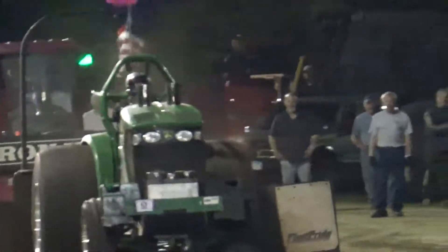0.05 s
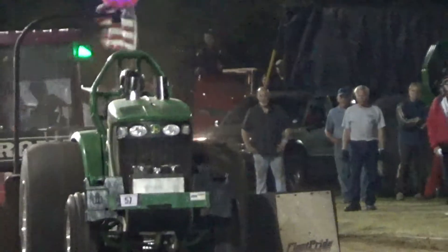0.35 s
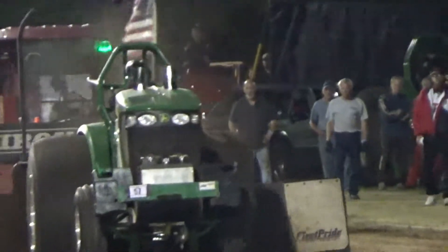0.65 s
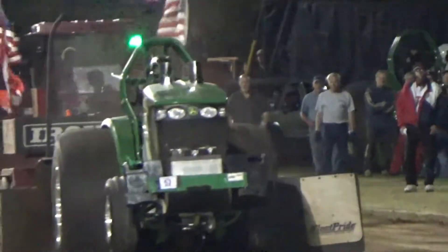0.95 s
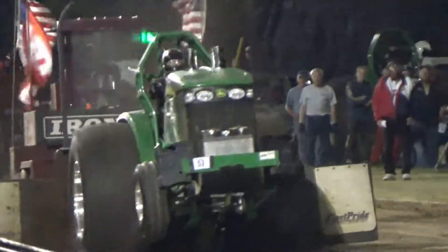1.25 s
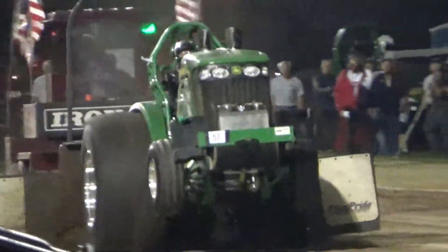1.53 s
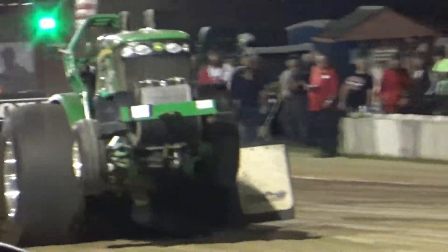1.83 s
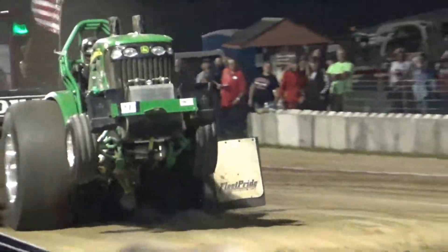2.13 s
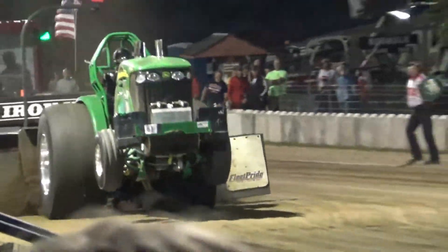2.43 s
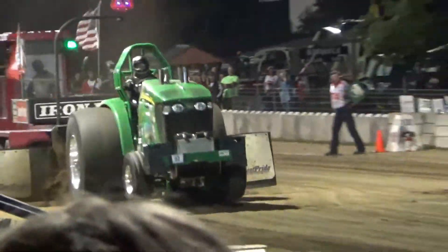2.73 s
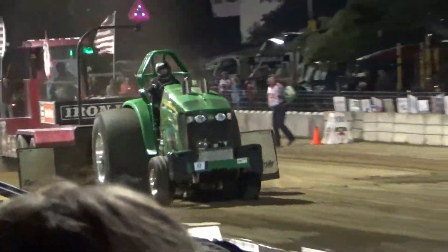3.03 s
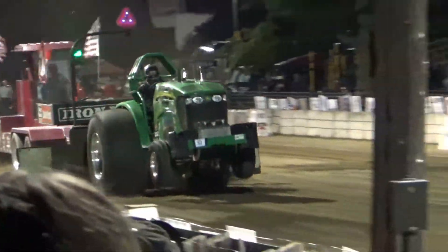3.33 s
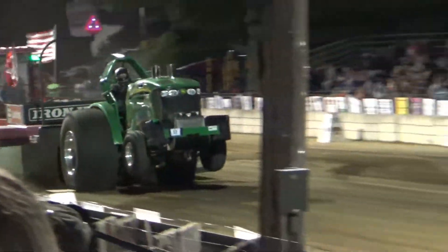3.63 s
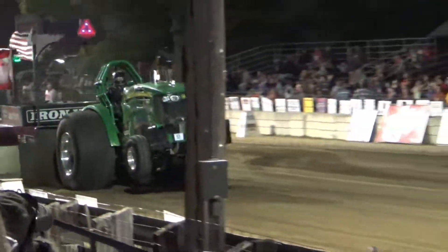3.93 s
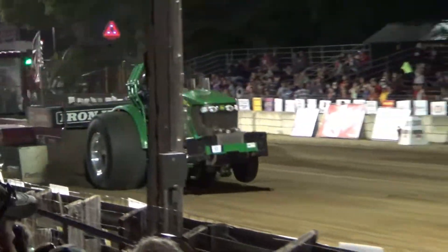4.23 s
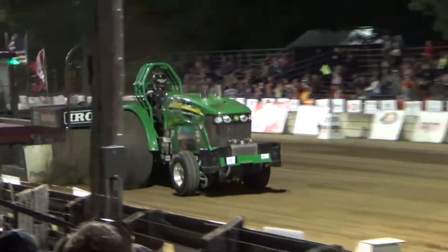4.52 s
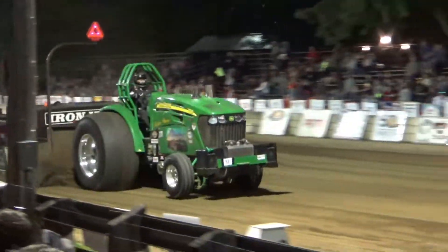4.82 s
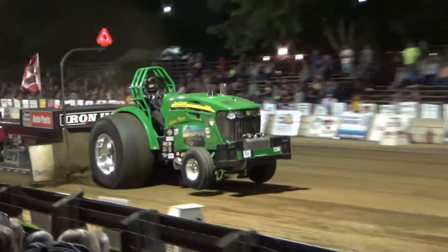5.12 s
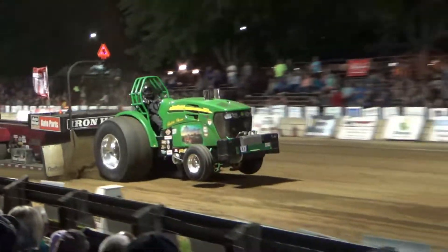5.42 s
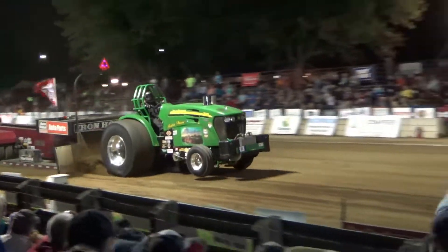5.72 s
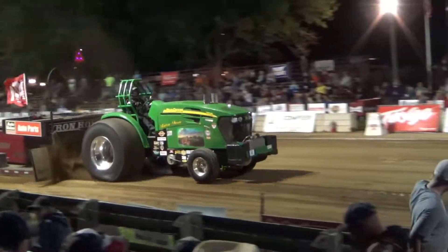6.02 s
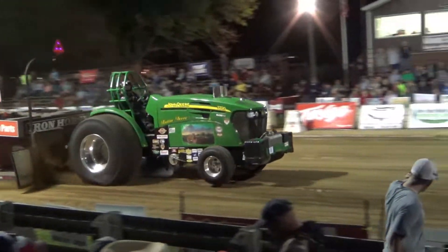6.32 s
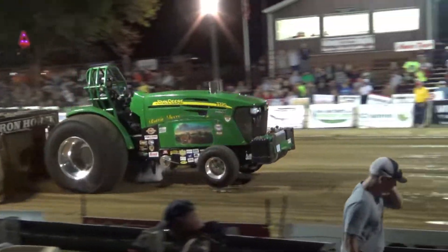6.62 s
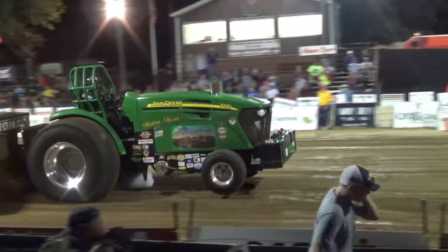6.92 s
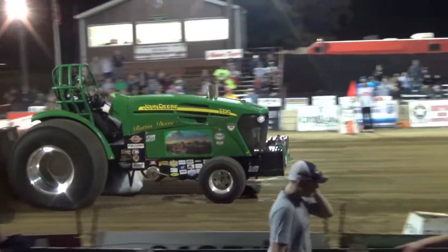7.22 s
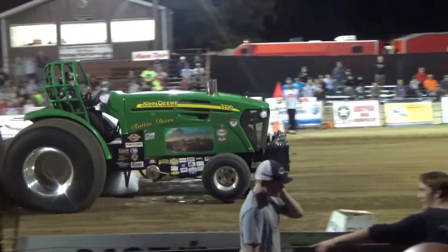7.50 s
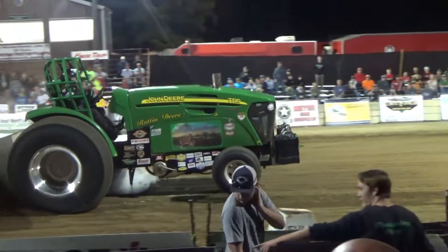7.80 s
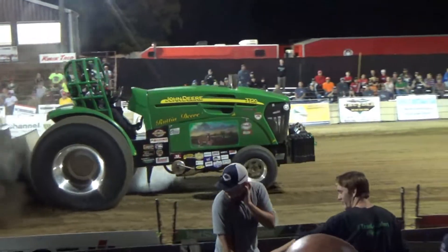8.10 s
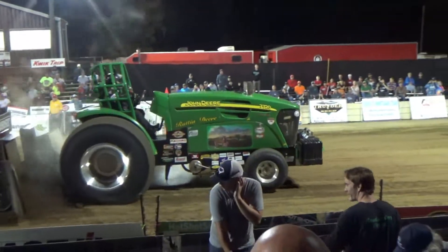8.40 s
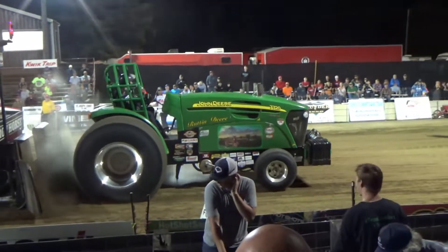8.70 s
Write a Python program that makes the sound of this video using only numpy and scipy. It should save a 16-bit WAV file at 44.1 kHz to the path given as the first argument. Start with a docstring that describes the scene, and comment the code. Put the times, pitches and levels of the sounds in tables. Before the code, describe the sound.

A turbocharged tractor approaches under heavy load, its rushing exhaust roar and engine drone topped by a piercing whistle.

```python
"""A jet-like roar comes head-on: a turbocharged six-cylinder pulling tractor dragging a sled at full power.
Turbulent gas rushes from its open stack, two turbo whistles waver with the revs, the firing drones below.
It passes behind a pole with a brief comb sweep and draws level with the stands,
loud enough to overload the microphone."""
import sys
import numpy as np
from scipy import signal
from scipy.fft import rfft, irfft, next_fast_len
from scipy.io import wavfile
from scipy.ndimage import uniform_filter1d, map_coordinates

SR = 44100
rng = np.random.default_rng(int(sys.argv[2]) if len(sys.argv) > 2 else 0)


def output_pcm(signal):
    """Save a mono or channel-first signal as 16-bit PCM at the path in sys.argv[1].

    Samples are clipped to [-1, 1] before scaling.
    """
    pcm = np.clip(np.atleast_2d(signal).T, -1, 1) * 32767
    wavfile.write(sys.argv[1], SR, np.round(pcm).astype(np.int16))


N = 394694

# the tractor's approach: (time [s], flank turned to the stands [0-1], closeness [0-1])
APPROACH = [(0, 0, 0), (2.6, 0, 0.07), (4, 0.27, 0.11), (5.1, 0.44, 0.1), (5.6, 0.67, 0.68), (7, 1, 0.92),
            (8.95, 0.85, .95)]
# low-mid body of the exhaust, which the engine's growl follows: (time [s], relative level [dB])
BODY_LEVEL = [(0, -30), (1.57, -31), (2.34, -36), (3.09, -29.5), (3.46, -32.5), (4.31, -27.5), (5.7, -26),
              (7.25, -24), (7.83, -25.5), (8.95, -24.5)]


def amp(db):
    return 10 ** (np.asarray(db) / 20)


def unit_rms(x):
    return x / np.sqrt(np.mean(x ** 2) + 1e-20)


def spectrum_at(points, hz):
    """(frequency, value) points joined on a log axis."""
    f, values = np.transpose(points)
    return np.interp(np.log(hz + 1), np.log(f + 1), values)


def curves(rows, times=None):
    """Each column after the time, read at every sample or at the given times."""
    seconds, *columns = np.transpose(rows)
    return [np.interp(np.arange(N) / SR if times is None else times, seconds, c) for c in columns]


def wobble(rate):
    """A smooth random curve, rate knots a second."""
    knots = rng.standard_normal(4096)
    coarse = np.arange(0, N + 32, 32)
    return np.interp(np.arange(N), coarse, map_coordinates(knots, [coarse * rate / SR], mode="wrap"))


def revs():
    """Engine and turbo rise and sag together as the tyres grip and slip, eased by their inertia."""
    # (time [s], half the firing rate [Hz], upper whistle pitch [Hz])
    speeds = [(0.0, 129.6, 8300.0), (0.2, 125.8, 8165.0), (0.52, 145.6, 8580.0), (0.83, 130.6, 8245.0),
              (1.07, 129.6, 8510.0), (1.4, 119.0, 8230.0), (1.68, 124.2, 8550.0), (1.98, 124.9, 8340.0),
              (2.26, 141.0, 8590.0), (3.1, 125.6, 8420.0), (3.45, 134.0, 8520.0), (3.8, 130.0, 8470.0),
              (4.0, 128.8, 8545.0), (4.25, 123.0, 8430.0), (5.0, 113.5, 8380.0), (5.45, 125.9, 8530.0),
              (5.85, 122.0, 8275.0), (6.1, 118.8, 8360.0), (6.45, 118.0, 8265.0), (6.9, 123.1, 8255.0),
              (7.4, 117.4, 8200.0), (8.6, 123.0, 8255.0), (8.95, 130.8, 8380.0)]
    return [uniform_filter1d(hz, size=4000) for hz in curves(speeds)]


def engine_cycles(half_firing_hz, flutter=0.003):
    """Four-stroke cycles completed, six firings each; the crank speed flutters under load."""
    cycle_hz = half_firing_hz / 3
    return np.cumsum(cycle_hz * (1 + flutter * wobble(14))) / SR


def engine_drone(cycles, firing_db=-60, firing_near_db=13, fading_db=2, spread=0.43):
    """Low engine orders fade in and out as their echoes shift; firing note and growl swell close by."""
    # the boom at half the firing rate: (time [s], relative level [dB])
    boom_level = [(0, -62), (.2, -46), (.5, -65), (.9, -56), (1.6, -54), (2.05, -56), (2.4, -67),
                  (3.2, -52), (3.38, -68), (3.8, -58), (4.3, -59), (4.8, -53), (5.4, -57), (5.7, -62),
                  (8.95, -59)]
    # the growl's partials: (order [multiple of the cycle rate], relative level [dB])
    growl_orders = [(2, -40), (4, -35), (5, -46), (7, -29), (8, -29.5), (9, -27), (11, -21.5), (12, -17),
                    (13, -19.5), (14, -22), (15, -14.5), (16, -16), (17, -20), (18, -29), (20, -20)]
    _, close = curves(APPROACH)
    boom_db = curves(boom_level)[0] - 0.5
    growl_db = curves(BODY_LEVEL)[0] - 1 - 5 * (1 - close)
    partials = [(3, boom_db), (6, firing_db + firing_near_db * close ** 2)]
    partials += [(order, growl_db + db) for order, db in growl_orders]
    drone = np.zeros((2, N))
    for order, db in partials:
        phase = 2 * np.pi * order * cycles + 0.3 * wobble(10)
        level = np.sqrt(2) * amp(db + fading_db * wobble(12))
        side = spread * close * np.sin(phase + 2 * wobble(2.2))
        drone += level * np.array([np.sin(phase), side])
    return drone


def whistle(pitch_hz, level, flutter_hz, flicker_db, echo_db, blur_hz, echo_s=0.07, fading_db=0.8):
    """A compressor's blade tone that fades in and out, with a late, blurred return from the stands."""
    db = curves(level)[0] + fading_db * wobble(6.1)
    phase = 2 * np.pi * np.cumsum(pitch_hz + flutter_hz * wobble(40)) / SR
    tone = np.sqrt(2) * amp(db) * np.exp(1j * phase)
    direct = tone.real * amp(flicker_db * wobble(25))
    late = np.pad(tone, (int(echo_s * SR), 0))[:N]
    scatter = lambda: (late * (wobble(2 * blur_hz) + 1j * wobble(2 * blur_hz))).real / np.sqrt(2)
    return np.array([direct + amp(echo_db) * scatter(), amp(echo_db - 12) * scatter()])


def turbo_whistles(turbo_hz, lower_ratio=0.9645):
    """Two turbos sing side by side, the second spinning a little slower."""
    # swells of the upper and the lower whistle: (time [s], relative level [dB])
    upper_level = [(0, -33), (.8, -33), (2, -25), (2.6, -33), (4, -24.5), (4.2, -28), (4.95, -25),
                   (5.27, -18.5), (5.6, -26), (6.1, -16.5), (6.35, -22.5), (7, -21.5), (8.4, -27),
                   (8.95, -26)]
    lower_level = [(0, -50), (4.25, -35), (4.5, -24), (4.9, -33), (5.27, -20.5), (5.9, -29), (6.9, -31),
                   (7.3, -28), (7.95, -41), (8.7, -23.5), (8.95, -34)]
    upper = whistle(turbo_hz, upper_level, flutter_hz=10, flicker_db=2.2, echo_db=-2, blur_hz=60)
    lower = whistle(lower_ratio * turbo_hz, lower_level, flutter_hz=6, flicker_db=2, echo_db=-8,
                    blur_hz=50)
    return amp(-2) * upper + amp(2) * lower


def track_bounce(hz, t, close, far_share=0.17, near_share=0.087, dull_hz=3900):
    """The reflection off the track cuts a comb that shifts on the move; rough dirt scatters its treble."""
    # lag of the reflection: (time [s], delay [s])
    bounce_delay = [(0, 0.00093), (.9, 0.00087), (1.6, 0.00091), (2.1, 0.00046), (2.65, 0.00058),
                    (3.3, 0.00026), (4.2, 0.00032), (5.25, 0.00056), (5.9, 0.00065), (7.2, 0.0012),
                    (8.95, 0.0013)]
    delay, = curves(bounce_delay, t)
    share = (far_share * (1 - close) + near_share * close) / (1 + (hz / dull_hz) ** 4)
    return np.abs(1 - share * np.exp(-2j * np.pi * hz * delay))


def pole_sweep(hz, t, crossing_s=4.25, reach_s=0.33, behind_s=0.14, shadow_db=-2, shadow_hz=7000):
    """Sound bent round the pole sweeps a comb as its detour shrinks and grows; behind it, treble dips."""
    offset = t - crossing_s
    detour_s = np.where(offset < 0, 0.00056, 0.0016) * offset ** 2
    nearby = np.exp(-(offset / reach_s) ** 2 / 2)
    hidden = np.exp(-(offset / behind_s) ** 2)
    share = 0.34 * nearby * (1 - hidden) / np.hypot(1, hz * detour_s)
    comb = np.abs(1 - share * np.exp(1j * np.pi / 4 - 2j * np.pi * hz * detour_s))
    return comb * amp(shadow_db * hidden * hz / (hz + shadow_hz))


def roar_colour(hz, flank):
    """The roar's overall colour plus its broad peaks in dB, crossfaded from head-on to side-on."""
    # overall colour, head-on and side-on: (frequency [Hz], relative level [dB])
    colour_ahead = [(30, -27), (180, -24), (300, -22), (400, -19), (490, -12), (600, -10), (900, -6.5),
                    (2500, -5.5), (5200, -1.4), (7200, -4.5), (8100, 0.5), (9200, -1), (10500, -4),
                    (13000, -17), (15500, -27)]
    colour_abeam = [(30, -39), (144, -30), (237, -22.5), (340, -19.5), (480, -9), (658, -4.5), (855, -5.5),
                    (1170, -3.4), (2500, 0), (7100, -0.2), (9800, -2.5), (11500, -8.5), (15000, -17.5)]
    # broad peaks that colour the roar, head-on and side-on: (centre [Hz], width [Hz], boost [dB])
    peaks_ahead = [(334, 83, 6), (610, 120, 3), (1173, 71, 5), (1460, 110, 1.5), (1983, 280, 5),
                   (2590, 480, 3.5)]
    peaks_abeam = [(465, 61, 3.2), (637, 120, 2), (1180, 150, 1.8), (2170, 140, 2)]

    def voiced(colour, peaks):
        boost_db = sum(db / (1 + (2 * (hz - centre) / width) ** 2) for centre, width, db in peaks)
        return spectrum_at(colour, hz) + boost_db

    return (1 - flank) * voiced(colour_ahead, peaks_ahead) + flank * voiced(colour_abeam, peaks_abeam)


def ride_bands(gain, hz, t, close, near_db=0.17):
    """Ride the jet's five bands: rumble, body, rasp, rush and hiss; rasp and rush move as one roar."""
    # borders of the bands: (frequency [Hz])
    edges_hz = [0, 400, 1500, 4000, 8300, 30000]
    # fader rides: (time [s], relative level [dB])
    rumble_level = [(0, -41.5), (1.3, -44), (2.3, -50), (3.2, -48), (4.5, -46), (5.7, -42.5), (7, -40),
                    (8.95, -40)]
    roar_level = [(0, -19), (1.2, -19.5), (2.1, -21.5), (3.1, -20), (4.6, -18), (5.25, -18), (5.6, -14),
                  (6.1, -15), (7.2, -13.8), (8.95, -14.5)]
    hiss_level = [(0, -28.7), (1.3, -26.5), (2.4, -22.5), (3.04, -26), (3.5, -22.5), (3.8, -23.5),
                  (4.5, -22), (5.05, -22), (5.45, -18), (8.1, -17), (8.95, -19)]
    rides = [(rumble_level, -1.5), (BODY_LEVEL, 0.5), (roar_level, -4), (roar_level, -1.15),
             (hiss_level, 2)]
    for low, high, (level, trim_db) in zip(edges_hz, edges_hz[1:], rides):
        band = (hz >= low) & (hz < high)
        band_rms = np.sqrt(np.sum(gain[band] ** 2, axis=0) / len(hz))
        gain[band] *= amp(curves(level, t)[0] + trim_db + near_db * close) / band_rms
    return gain


def exhaust_jet(cycles, pulsing=0.043, uneven=0.023, churn_db=0.35, surge_db=0.2, ripple_db=1.7):
    """Turbulent gas leaves the stack in a puff per firing, brighter and fuller as the flank turns near."""
    # stereo width far off and close by: (frequency [Hz], side over mid [dB])
    width_far = [(100, -32), (250, -29), (420, -17), (600, -17.5), (1000, -17.5), (3000, -13),
                 (5000, -17.5), (7500, -10.5), (10000, -51), (14000, -70)]
    width_near = [(60, -10), (200, -4), (350, -1.5), (600, -7), (880, -4), (1500, -9), (3000, -12.5),
                  (5000, -17.5), (8000, -15), (14000, -75)]
    puffs = 1 + pulsing * np.cos(2 * np.pi * 6 * cycles) + uneven * np.cos(2 * np.pi * 4 * cycles)
    churn = amp(churn_db * wobble(45) + surge_db * wobble(8))
    hz, t, gas = signal.stft(rng.standard_normal((2, N)) * puffs * churn, SR, nperseg=2048)
    f = hz[:, None]
    flank, close = curves(APPROACH, t)
    colour_db = roar_colour(f, flank)
    # reflections from the stands interfere in fine, slowly drifting ripples
    ripples = uniform_filter1d(rng.standard_normal(colour_db.shape), size=3, axis=0)
    ripples = unit_rms(uniform_filter1d(ripples, size=16, axis=1))
    gain = amp(colour_db + ripple_db * ripples) * track_bounce(f, t, close)
    gain = ride_bands(gain, hz, t, close) * pole_sweep(f, t)
    spread = (1 - close) * amp(spectrum_at(width_far, f)) + close * amp(spectrum_at(width_near, f))
    return signal.istft(gas * np.array([gain, gain * spread]), SR)[1][:, :N]


def scene():
    """Whistles, jet and drone are mixed as mid and side, then turned into left and right."""
    # a slight lean to the right: (time [s], left over right [dB])
    balance = [(0.0, -1), (2.04, -0.5), (6.5, -0.3), (8.95, -0.5)]
    half_firing_hz, turbo_hz = revs()
    cycles = engine_cycles(half_firing_hz)
    mid, side = turbo_whistles(turbo_hz) + exhaust_jet(cycles) + engine_drone(cycles)
    pan_db, = curves(balance)
    return np.array([(mid + side) * amp(pan_db / 2), (mid - side) * amp(-pan_db / 2)])


def record(dry, ceiling=0.57, hardness=8, low_cut_hz=90, soft_top_hz=15000, top_hz=15900):
    """The overloaded input rounds off both channels' peaks together; a low cut and band limit follow."""
    drive = np.abs(dry.mean(axis=0) / ceiling)
    clipped = dry / (1 + drive ** hardness) ** (1 / hardness)
    size = next_fast_len(N + SR // 4, True)
    hz = np.fft.rfftfreq(size, 1 / SR)
    low_cut = hz / np.hypot(hz, low_cut_hz)
    band_limit = (hz < top_hz) / np.hypot(1, (hz / soft_top_hz) ** 10)
    return irfft(rfft(clipped, size) * low_cut * band_limit, size)[:, :N]


dry = scene()
out = record(dry)
output_pcm(out)
```